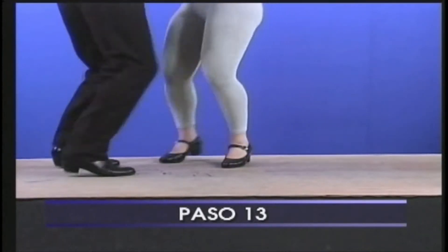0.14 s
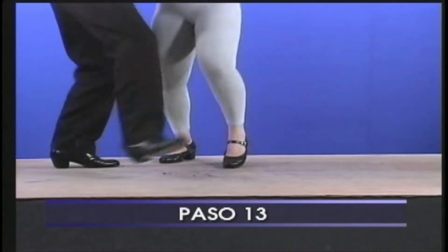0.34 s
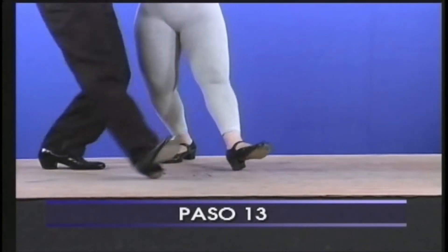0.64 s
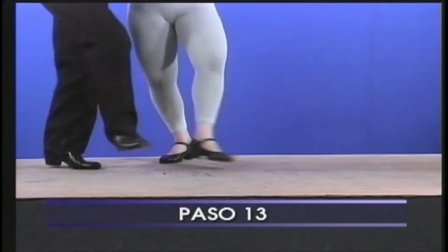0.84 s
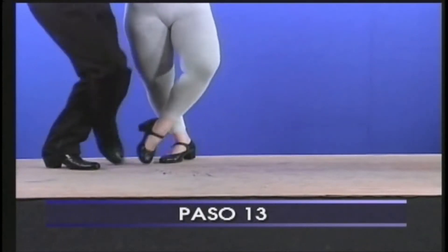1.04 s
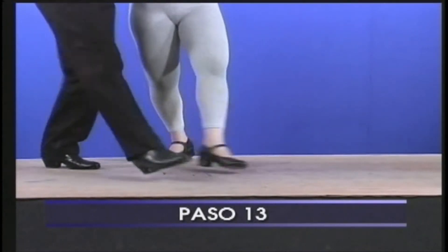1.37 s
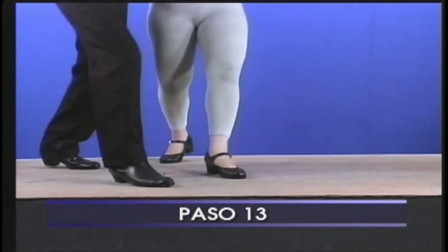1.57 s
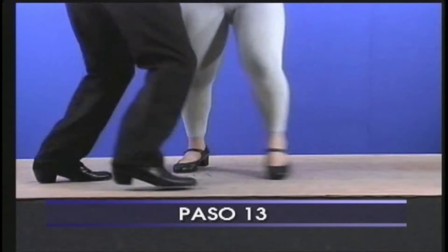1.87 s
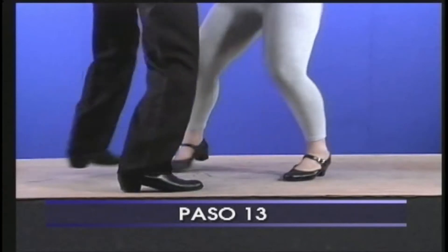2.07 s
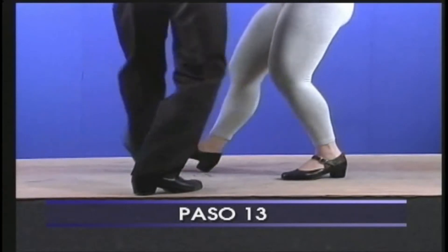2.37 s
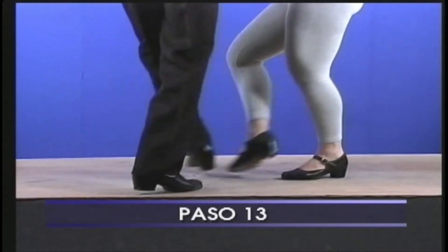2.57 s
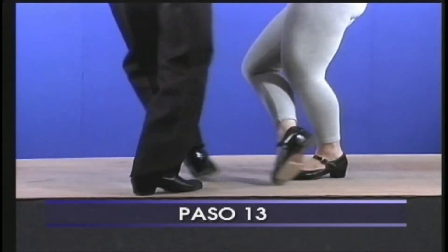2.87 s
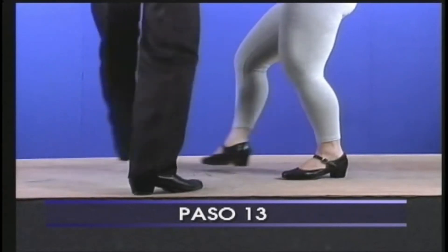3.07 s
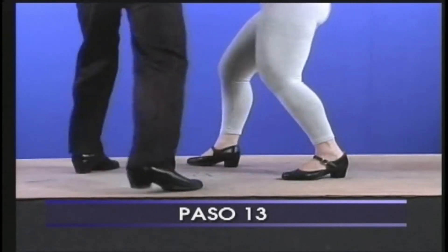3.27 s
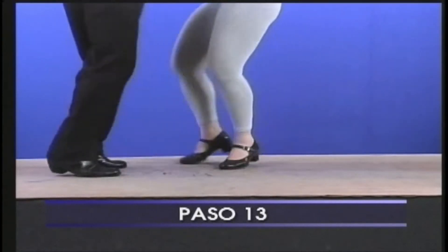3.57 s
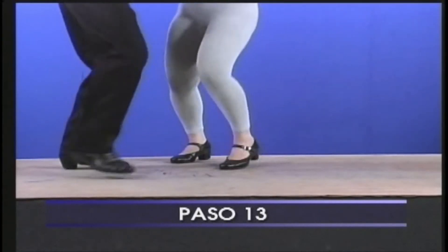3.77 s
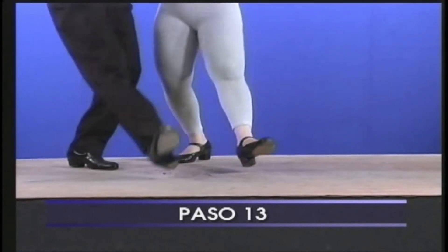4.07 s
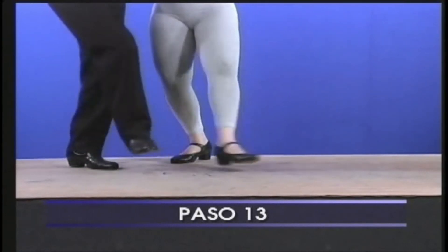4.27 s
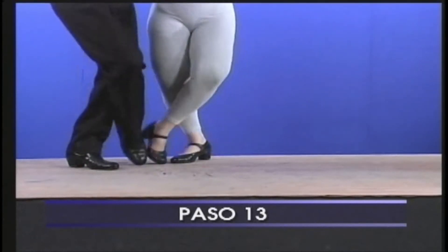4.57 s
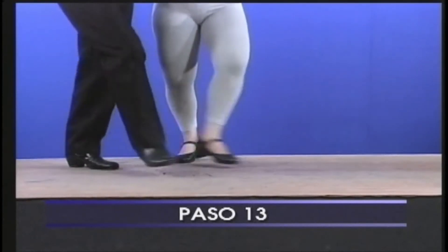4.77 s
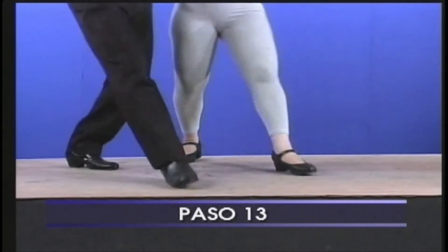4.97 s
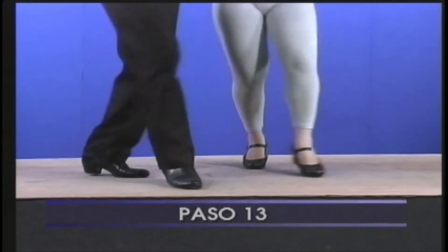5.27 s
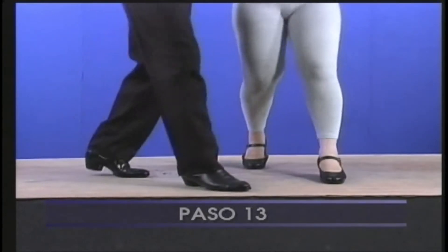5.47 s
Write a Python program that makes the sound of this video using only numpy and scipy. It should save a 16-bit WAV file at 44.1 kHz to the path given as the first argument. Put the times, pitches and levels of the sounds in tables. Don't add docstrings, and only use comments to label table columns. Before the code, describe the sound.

Two dancers in hard leather-soled shoes stamp on a hollow wooden platform in a small studio. A pair of knocks opens, a sharp double stamp follows, then softer steps and scuffs. The loudest stamp comes mid-way, and the pattern repeats. One microphone hears a brief room echo over very faint hiss.

```python
import sys
import numpy as np
from scipy import signal
from scipy.fft import rfft, irfft
from scipy.io import wavfile
from scipy.ndimage import uniform_filter1d

SR = 44100
rng = np.random.default_rng(int(sys.argv[2]) if len(sys.argv) > 2 else 0)


def rack_gain(trim_db):
    fader = np.asarray(trim_db, float)
    return 10 ** (fader / 20)


def inscribe(sig):
    pcm = np.round(np.clip(np.atleast_2d(sig).T, -1, 1) * 32767)
    wavfile.write(sys.argv[1], SR, pcm.astype(np.int16))


N = 248238
SPOT_SIZE = 2 ** 14


def on_log(table, hz):
    table_hz, value = np.array(table).T
    return np.interp(np.log(np.maximum(hz, 1)), np.log(table_hz), value)


def bins_hz(size):
    return np.arange(size // 2 + 1) * SR / size


def coloured(table, db):
    size = 2 ** 18
    spectrum = rfft(rng.standard_normal(size)) * rack_gain(on_log(table, bins_hz(size)))
    x = irfft(spectrum, size)[:N]
    return x * rack_gain(db) / np.std(x)


def band(x, lo_hz, hi_hz):
    sos = signal.butter(2, [lo_hz, min(hi_hz, 0.45 * SR)], "bandpass", fs=SR, output="sos")
    return signal.sosfilt(sos, x)


def slides():
    # start in seconds, length in seconds, rasp in dB, swish and rumble in dB above the rasp.
    slide_rows = [(-0.01, 0.12, -53.5, -15.5, 6.5), (0.486, 0.046, -64, 2.5, 3), (1.702, 0.13, -52, -33, 1),
                  (1.776, 0.071, -74.5, 16, 11), (1.933, 0.048, -54, -15, 0),
                  (2.068, 0.024, -67.5, 8.5, 40), (2.876, 0.04, -43, -24, -14), (3.485, 0.2, -53, -19, 2),
                  (5.185, 0.13, -54, -39, 1), (5.258, 0.066, -71.5, 13, 9), (5.447, .06, -47.5, -7, -12)]
    grit_db, catch_db, catch_per_s, edge_s = 2.4, 4, 90, 0.0019
    t, out = np.arange(N) / SR, np.zeros(N)
    grit = rng.standard_normal(N) * rack_gain(grit_db * rng.exponential(size=N))
    held = int(SR / catch_per_s)
    catches = np.repeat(rng.standard_normal(N // held + 1), held)[:N]
    grit *= rack_gain(catch_db * uniform_filter1d(catches, held // 2))
    rasp = band(grit, 600, 3300)
    swish = band(rng.standard_normal(N), 3600, 9100)
    rumble = band(rng.standard_normal(N), 33, 360)
    rasp, swish, rumble = (x / np.std(x) for x in (rasp, swish, rumble))
    for start_s, length_s, db, swish_db, rumble_db in slide_rows:
        edge = np.clip(np.minimum(t - start_s, start_s + length_s - t) / edge_s, 0, 1)
        press_db = np.interp((t - start_s) / length_s, [0, 0.3, 1], [-9.5, 0, -25])
        rub = rasp + rack_gain(swish_db) * swish + rack_gain(rumble_db - 9) * rumble
        out += edge * rack_gain(db + press_db - 16.5) * rub
    return out


def studio(size, count):
    # frequency in Hz, T60 in seconds.
    room_t60_s = [(40, 0.51), (110, 0.33), (300, 0.4), (800, 0.35), (2000, 0.37), (5000, 0.32),
                  (12000, 0.36)]
    # frequency in Hz, level in dB.
    room_colour_db = [(40, -2), (110, 9), (300, 4.03), (800, 3.5), (2000, -1.5), (5000, -9), (12000, -8)]
    room_db, build_s = 6, 0.0066
    sparse_db, sparse_s = 5, 0.09
    early_db, early_s = 15.5, 0.0066
    wall_db, wall_s, wall_smear_s = 1.5, 0.1, 0.11
    t, tail = np.arange(size) / SR, 0
    chance = rng.exponential(size=(count, size))
    sparse = rack_gain(sparse_db * np.exp(-t / sparse_s) * (np.minimum(chance, 4) - 2))
    noise = rfft(rng.standard_normal((count, size)) * sparse)
    octave = np.log2(np.arange(1, size // 2 + 2) * SR / size)
    swell_db = early_db * np.exp(-t / early_s) + wall_db * np.exp(-((t - wall_s) / wall_smear_s) ** 2)
    build = (1 - np.exp(-t / build_s)) * rack_gain(swell_db)
    for hz in 40 * 2 ** np.arange(10):
        share = np.clip(1 - np.abs(octave - np.log2(hz)), 0, 1)
        decay = 1000.0 ** (-t / on_log(room_t60_s, hz))
        echoes = irfft(noise * share, size) * build * decay
        energy = np.sum(echoes ** 2, axis=1, keepdims=True)
        level = rack_gain(room_db + on_log(room_colour_db, hz))
        tail = tail + echoes * level * np.sqrt(np.mean(share ** 2) / energy)
    return tail


def contacts():
    # time in seconds, deck boom in dB.
    settle_rows = [
        (0.001, -56.5),
        (3.591, -48.5),
        (3.637, -45.5),
        (5.29, -62),
        (5.366, -63),
    ]
    # time in seconds, knock in dB, body weight and edge
    # hardness in dB above it.
    touch_rows = [(0.104, -70, -2.5, -7), (0.207, -83, -17.5, 0), (0.615, -78, -5, -10),
                  (0.98, -59.5, -0.5, -15), (1.512, -61, -2, -26.5), (1.542, -67, 7.5, 2.5),
                  (1.771, -59, 4, 3.5), (2.323, -61.5, -2.5, -15), (2.462, -31, -18, -16),
                  (2.803, -73, 12, -9), (3.111, -74.5, 0.5, -27), (3.261, -61.5, 12, 1.7),
                  (3.292, -49, -7.5, -6.5), (3.493, -66.5, 2.5, 3.5), (3.815, -59, -3, -12.5),
                  (3.842, -59.5, -3, -12.5), (4.0, -62.5, 1, -26.5), (4.554, -78, 3.5, -19),
                  (4.584, -60.5, 14, 6), (5.038, -63, -11.5, -1), (5.054, -66, -4, -2),
                  (5.196, -70, -3, 6.5), (5.244, -68.5, 1, 6)]
    # time in seconds, knock in dB, then in dB above it
    stamp_rows = [(0.094, -39, -4, -5, -8.5), (0.214, -31, -8, -7, -7), (0.53, -45, -1.5, -7.5, -11),
                  (0.689, -28, -18.5, -11.5, -12), (0.701, -30.5, -14, -3.5, -11), (1.105, -48.5, 0, 1, -7),
                  (1.567, -41, -4, -2.5, -10), (1.876, -42, -7, -7.5, -8), (1.999, -42.5, -6.5, -25, -18.5),
                  (2.049, -45.5, -12, -0.5, -9), (2.408, -38, -15, -0.5, -8), (2.445, -26, -10, -10, -12),
                  (2.832, -51.5, 12.5, -4, -10.5), (2.857, -43.5, -4.5, 9.5, -14.5),
                  (3.301, -34.5, -12.5, -7, -6.5), (3.706, -53, 5, 1.8, 2), (4.179, -40.5, -9, -6, -6.5),
                  (4.186, -27.5, -13.5, -7.5, -15), (4.599, -43, -17, -5.5, -3.5),
                  (4.997, -41.5, -13.5, -5, -20), (5.023, -41.5, -6, -4.5, -23.5),
                  (5.418, -39.5, -7.5, -7, -18.5), (5.436, -36.5, -16, -9.5, -22), (5.459, -55.5, 5, 8, -1)]
    settle_weight_db, settle_edge_db = 26, -1.5
    thud_per_weight = 0.22
    tick_db, tick_per_hard = -17, 0.52
    light = list(touch_rows)
    for s, boom_db in settle_rows:
        light.append((s, boom_db - settle_weight_db, settle_weight_db, settle_edge_db))
    light = [(s, db, weight, thud_per_weight * weight, hard) for s, db, weight, hard in light]
    s, knock, weight, flat, hard = np.transpose(list(stamp_rows) + light)
    crack = knock + hard
    tick = crack + tick_db + tick_per_hard * hard
    return np.transpose([s, knock, knock + weight, knock + flat, crack, tick])


def causal(table, size):
    cepstrum = irfft(np.log(rack_gain(on_log(table, bins_hz(size)))), size)
    cepstrum[1:size // 2] *= 2
    cepstrum[size // 2 + 1:] = 0
    return np.exp(rfft(cepstrum))


def ring(modes, t):
    hz, db, t60_s = np.transpose(modes)
    weigh, sign, detune = rng.standard_normal((3, len(modes)))
    gain = rack_gain(db + 1.7 * weigh) * np.sign(sign + 0.71)
    pole = np.exp((2j * np.pi * hz * (1 + 0.024 * detune) - np.log(1000) / t60_s) / SR)
    tap = signal.unit_impulse(len(t)) + 1e-18
    out = np.zeros(len(t))
    for g, p in zip(gain, pole):
        out += signal.lfilter([0, g * p.imag], [1, -2 * p.real, abs(p) ** 2], tap)
    return out


def blows():
    # frequency in Hz, level in dB, T60 in seconds.
    deck_modes = [(46, 7, 0.17), (51, -12, 0.022), (63.35, 0, 0.37), (78.5, -11.5, 0.19), (78.3, 2.5, 0.15),
                  (93.1, 9, 0.1)]
    # frequency in Hz, level in dB, T60 in seconds.
    board_modes = [(128.7, 2, 0.12), (152.7, 4.5, 0.06), (188.7, -13, 0.072), (236, -7, 0.052),
                   (266, -8, 0.099), (302, -3, 0.053), (393.7, -11.5, 0.13), (450, -7.5, 0.11),
                   (521.5, -3.5, 0.045), (572, -10, 0.035), (610, -3, 0.02), (760, -6.5, 0.0047),
                   (870, -7, 0.01), (1041, 12.5, 0.0093), (1253, 8, 0.015), (1638, -7.5, 0.041),
                   (1950, -4, 0.0038), (2340, -16, 0.044), (2700, 0, 0.018), (3124, 0.5, 0.015),
                   (3760, 2.5, 0.009), (4500, -10, 0.0042), (6000, -19, 0.0063)]
    colour_hz = (60, 210, 750, 2200, 5500, 14000)
    colour_db = (-7, 12, 7.5, 9, 10, -15)
    travel_s, direct_db = 0.0016, 5.5
    spread_hz, soft_hz = 3000, 2700
    under_s, under_db, under_hz = 0.0057, -4, 302
    edge_lag_s, edge_spread_s, edge_share = 0.00023, 0.00054, 0.7
    boards_db, boards_rise_s = -4, 0.0025
    push_s, boom_trim_db = 0.011, -2
    size = SPOT_SIZE
    out, t, hz = np.zeros(N + 2 * size), np.arange(size) / SR, bins_hz(size)
    spread = (1 - 1j * hz / spread_hz) / (1 + 1j * hz / spread_hz)
    spread /= 1 + 1j * hz / soft_hz
    under = rack_gain(under_db) * np.exp(-2j * np.pi * hz * under_s) / (1 + 1j * hz / under_hz) ** 2
    rows = contacts()
    answers = rfft(studio(size, count=len(rows)))
    for (s, knock, boom, thud, crack, tick), walls in zip(rows, answers):
        colour = np.array([thud, thud, knock, crack, tick, tick]) + colour_db
        pulse = causal(np.transpose([colour_hz, colour + 20]), size)
        lag_s = edge_lag_s + edge_spread_s * rng.random()
        edges = (1 + edge_share * np.exp(-2j * np.pi * hz * lag_s)) / np.hypot(1, edge_share)
        boards = ring(board_modes, t) * (1 - np.exp(-(t / boards_rise_s) ** 2))
        boards = rfft(boards * rack_gain(boards_db) / np.sqrt(np.sum(boards ** 2)))
        deck = signal.fftconvolve(ring(deck_modes, t), np.hanning(int(push_s * SR)))[:size]
        deck = rfft(rack_gain(boom + boom_trim_db) * deck / np.max(np.abs(deck)))
        direct = rack_gain(direct_db) * pulse * (boards - edges * spread - under) + deck
        fed = pulse * (1 - 0.44 * boards) + deck
        start = int((s + travel_s) * SR)
        out[start:start + size] += irfft(direct + fed * walls, size)
    return out[:N]


def slaps():
    # start in seconds, level in dB, pitch in Hz.
    slap_rows = [
        (0.715, -37, 265),
        (2.455, -28, 227.5),
        (2.857, -41.5, 297),
        (4.193, -30.5, 284),
        (5.025, -39.5, 485),
        (1.108, -37, 1304),
        (3.706, -36, 3130),
        (5.438, -59, 453),
    ]
    t60_cycles, rise_s = 18, 0.0011
    out, t = np.zeros(N + SR), np.arange(SR // 4) / SR
    for s, db, hz in slap_rows:
        envelope = (1 - np.exp(-t / rise_s)) * 1000.0 ** (-t * hz / t60_cycles)
        start = int(s * SR)
        out[start:start + len(t)] += rack_gain(db - 8) * envelope * np.sin(2 * np.pi * hz * t)
    return out[:N]


def scene():
    # frequency in Hz, level in dB per Hz.
    air_colour = [(15, -23), (25, -11), (75, -5), (360, -7), (2020, -18), (2940, -17.5), (4290, -22),
                  (5460, -17.5), (5920, -15), (6960, -20.5), (15600, -21.5)]
    feet = slides() + slaps()
    walls = signal.fftconvolve(feet, studio(SPOT_SIZE, count=1)[0])[:N]
    heard = blows() + feet + walls + coloured(air_colour, db=-85)
    return np.array([heard, heard])


def low_pass(x):
    return signal.sosfilt(signal.butter(12, 15760, fs=SR, output="sos"), x)


def record(dry):
    # frequency in Hz, rms level in dB.
    line_rows = [(59.6, -83.5), (119, -101), (3020, -108), (6051, -107), (11025, -111), (15734, -101)]
    # frequency in Hz, level in dB per Hz.
    hiss_colour = [(180, -23), (300, 6.5), (354, -20), (477, -5.5), (2180, -8.5), (2990, -1.5), (3240, -5),
                   (15600, -6)]
    mic_cut_hz, tape_full, hiss_db = 41, 0.1, -83
    left_cut_hz, right_cut_hz = 13, 6
    left_db, left_shelf_hz, left_shelf = -0.08, 700, 0.075
    t = np.arange(N) / SR
    lines = sum(rack_gain(db) * np.sqrt(2) * np.sin(2 * np.pi * hz * t) for hz, db in line_rows)
    mic = signal.sosfilt(signal.butter(5, mic_cut_hz, "highpass", fs=SR, output="sos"), dry)
    mic = tape_full * np.tanh(mic / tape_full)
    left = signal.lfilter(*signal.butter(1, left_cut_hz, "highpass", fs=SR), mic[0])
    right = signal.lfilter(*signal.butter(1, right_cut_hz, "highpass", fs=SR), mic[1])
    left_bass = signal.lfilter(*signal.butter(1, left_shelf_hz, fs=SR), left)
    left = rack_gain(left_db) * (left - left_shelf * left_bass)
    hiss = np.array([coloured(hiss_colour, hiss_db), coloured(hiss_colour, hiss_db)])
    return low_pass(np.array([left, right]) + lines + hiss)


dry = scene()
out = record(dry)
inscribe(out)
```